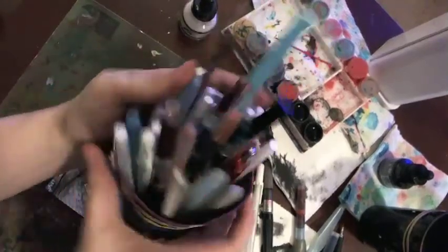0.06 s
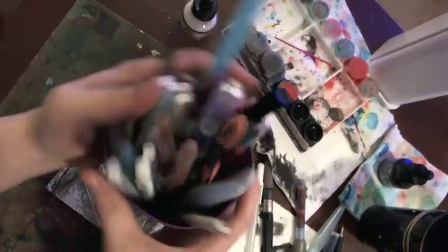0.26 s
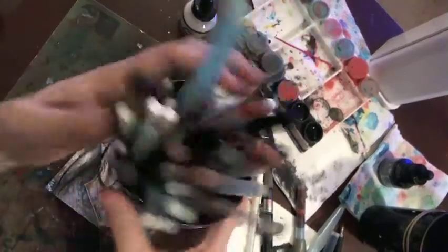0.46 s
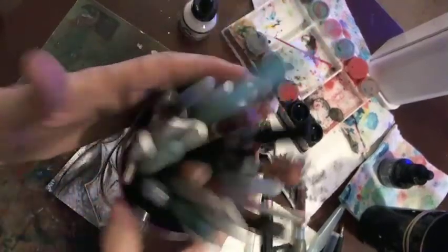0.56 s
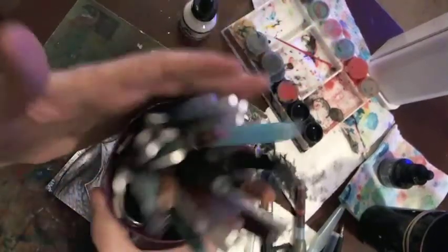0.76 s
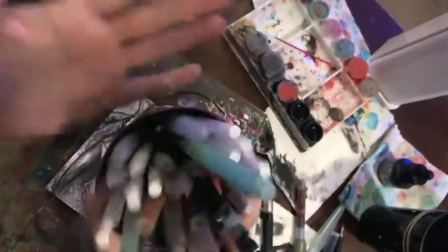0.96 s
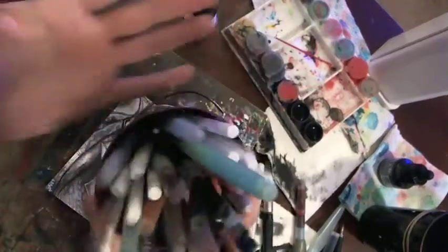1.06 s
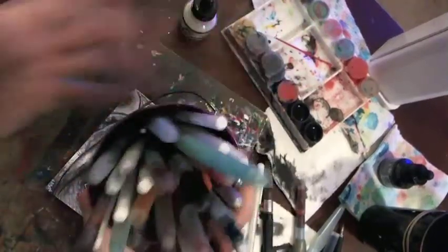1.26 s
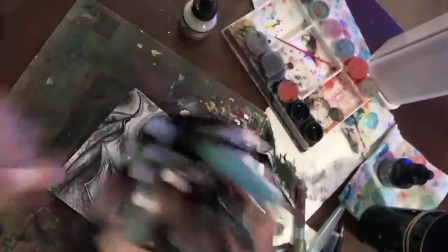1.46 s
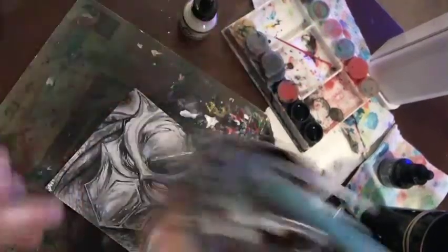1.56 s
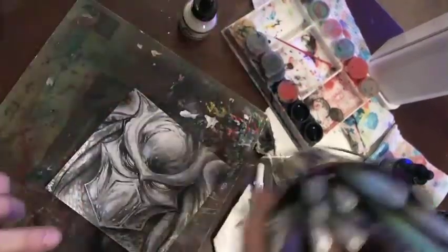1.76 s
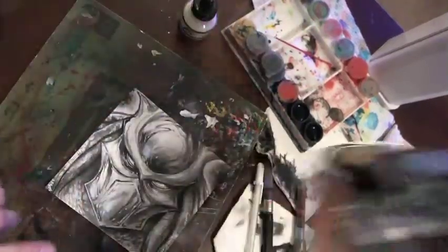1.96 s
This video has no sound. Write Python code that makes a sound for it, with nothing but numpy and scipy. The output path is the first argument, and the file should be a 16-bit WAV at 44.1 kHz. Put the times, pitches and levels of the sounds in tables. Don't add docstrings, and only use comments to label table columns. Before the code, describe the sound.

A cupful of pens and markers rattles brightly, pauses softly, then clatters again, close up

```python
import sys
import numpy as np
from scipy import signal
from scipy.fft import rfft, irfft
from scipy.io import wavfile

SR = 44100
rng = np.random.default_rng(int(sys.argv[2]) if len(sys.argv) > 2 else 0)


def generate_wav(signal):
    frames = np.transpose(np.atleast_2d(signal))
    scaled = np.clip(frames, -1, 1) * 32767
    pcm = np.round(scaled).astype(np.int16)
    wavfile.write(sys.argv[1], SR, pcm)


def natural_amplitude(level_db):
    exponent = np.asarray(level_db, float) / 20
    return 10 ** exponent


N = 88200

# [t/s, pen body peak level/dB, cup
# hollow re body level/dB, snap re body level/dB, ring of that pen f/Hz]
CLEAN_CLACKS = [(0.0388, -25.5, -27, -9.5, 2470), (0.1968, -16, -9.5, -15, 3000), (0.2083, -17, -5, 3, 5350),
                (0.2253, -0.5, -6.5, -8.5, 2497), (0.2411, -15.5, -3, -2.5, 1870),
                (0.2482, -4.5, -6, -10, 5300), (0.2493, -17.5, 6.5, 20, 5260), (0.329, -12, -6.5, 3.5, 3860),
                (0.3706, -13, -36, 18, 4600), (0.3731, -8.5, -2.5, 10, 4440),
                (0.4014, -17.5, -3, -5.5, 1890), (0.414, -4.5, -10, -15.5, 1920),
                (0.4348, -11.5, -14, -17, 2040), (0.4454, -14.5, -2.5, -5, 2580),
                (0.4817, -7, -15.5, -13, 1600), (0.5121, -20.5, -12.5, 11.5, 5470),
                (0.5211, -15, -10, 5.5, 5440), (0.5364, -18, -5, -13, 2460),
                (0.5932, -4.5, -16.5, -43.5, 1960), (0.6085, -8.5, -6.5, -3.5, 3820),
                (0.6139, -14.5, -3, 0, 2520), (0.6335, -13, -16, -6, 1890), (0.6474, -18, -16, -0.5, 2630),
                (0.849, -26, -40, -12, 2560), (0.8602, -24, -41.5, -5.5, 2280),
               (0.8945, -11, -15, -4.5, 2390), (0.9079, -11, -7.5, 2.5, 4780),
               (1.1806, -16, -8, -6.5, 2620), (1.255, -21.5, -49, -19, 2230),
               (1.3625, -39.5, 5.5, 11, 5240), (1.3935, -27, -27, -2, 2720),
               (1.412, -32, -20.5, -5.5, 2670), (1.4451, -35, -7.5, -1.5, 2630),
               (1.4507, -19.5, -23.5, -19, 1610), (1.4844, -19.5, -1, -4.5, 1710),
               (1.4935, -7.5, -12, -5, 2695), (1.5381, -8, -5.5, 5.5, 5350), (1.5478, -9, -2.5, 0.5, 2660),
               (1.6136, -23.5, -6.5, 5.5, 1660), (1.6357, -23.5, -17, 0, 2480), (1.659, -1.5, -10, 1, 2520),
               (1.6729, -18, -36.5, 0.5, 2780), (1.6801, -24.5, -9.5, 10.5, 8960),
               (1.6848, -25, -17.5, 12, 5270), (1.8493, -16.5, -14, -2, 1330),
               (1.8952, -19, -34, -4.5, 5110)]
# [t/s, pen body peak level/dB, cup hollow re body
# level/dB, snap re body level/dB, ring of that pen f/Hz]
GLANCING_CLACKS = [(0.0575, -26.5, -3, -16.5, 2460), (0.0754, -24, -2.5, -6, 2270),
                   (0.0901, -25.5, -5.5, -2, 5370), (0.1454, -36, 6, -5.5, 1590), (0.1854, -28, -9, 0.5, 5270),
                   (0.3844, -12.5, -6, 7.5, 5850), (0.4526, -11, -2, -0.5, 2800), (0.4942, -18, -8, -3, 2780),
                   (0.5544, -19.5, -5, -14.5, 1890), (0.57, -16.5, -2.5, -16.5, 1940),
                   (0.5856, -14, -32, -5, 1940), (0.6921, -16, -7, -4, 1626), (1.237, -34, -34, -21, 2550),
                   (1.2919, -39, -8, 3.5, 5900), (1.3523, -20, -13, -11, 2500), (1.4214, -35.5, -7, 0.5, 2750),
                   (1.4755, -9.5, -7, -19.5, 1560), (1.5213, -13, -1, -7, 2620),
                   (1.6191, -10, -6.5, -7.5, 1740), (1.8984, -32, -45.5, 16.5, 5420),
                   (0.818, -48, 8.5, -26.5, 2570),
    (1.147, -71.5, 39, -4.5, 1760),
    (1.2039, -30.5, -8, -16.5, 2580),
    (1.3094, -41, -15, -19, 2700),
    (1.3746, -31, -19, 3.5, 5320),
    (1.526, -18, -3, -3, 2683),
    (1.6264, -16.5, -1, -17, 2610),
]
# [t/s, pen body peak level/dB, cup hollow re body level/dB, snap
# re body level/dB, ring of that pen f/Hz]
MORE_CLEAN_CLACKS = [(.1895, -26.5, -4, -5, 2640), (.3145, -21, -8, -11, 1800), (.3775, -19.5, -19, 7.5, 8300),
                     (.3865, -20, -18.5, 5, 4380), (.394, -21, -12, 1.5, 6950), (.4245, -18.5, -17, -5.5, 2490),
                     (.4385, -9.5, -13.5, -8, 2100), (.4495, -10, -2, -1, 2480), (.454, -13.5, -9.5, 3, 5740),
                     (.4995, -17.5, -18.5, -9, 2700), (.5295, -21.5, -13, -5.5, 2600),
                     (.5525, -23, -10.5, -1, 4300), (.5585, -22, -10, -1.5, 4270), (.573, -18, -11, -7, 3020),
                     (.741, -49.5, 1, -17, 2480), (.946, -35, -21, -12, 2610), (1.105, -64, -21, 7, 5020),
                     (1.475, -30.5, -13, 0.5, 5250), (1.5, -23, -24, -1, 4500), (1.532, -17, -5, -4.5, 2050),
                     (1.6215, -13.5, -13, -1.5, 3600), (1.628, -19, -13, -9, 3540),
                     (1.711, -32, -17.5, 2.5, 2600), (1.737, -36.5, -20, 0, 2600), (1.812, -53, 8, -5, 2660),
                     (1.975, -54.5, -28.5, -1.5, 4240)]
# [t/s, level/dB, level/dB, level/dB, f/Hz]
PEN_SLIDES = [
    (.268, -24.5, -5.5, -5, 2600),
    (.925, -35, -10, -8.5, 2600),
    (1.192, -34.5, -6, -5.5, 2550),
    (1.243, -36.5, -22, -7.5, 2400),
    (1.265, -42, -6, -21, 2600),
    (1.302, -44, -2, -7, 2700),
    (1.366, -34.5, -15, -7, 2600),
    (1.4, -46, -10, -6, 2600),
    (1.862, -38, -12, -3.5, 2600),
    (1.91, -39.5, -29.5, 3.5, 5030),
]
# [t/s, peak level/dB, f/Hz]
BASE_KNOCKS = [
    (0.448, -41, 400),
    (.611, -31, 376),
    (1.478, -39, 420),
    (1.525, -35.5, 341.5),
    (1.549, -35, 326),
    (1.1465, -42.5, 800),
    (1.4783, -13.5, 1434),
]
# [t/s, level/dB]
SLIDING_LEVEL = [(0, -55), (0.052, -43.5), (0.146, -39.5), (0.177, -61), (0.201, -37), (0.449, -29),
                 (0.657, -34.5), (.75, -66), (0.879, -53), (0.928, -44), (0.999, -73.5), (1.16, -75.5),
                 (1.2, -84), (1.439, -58), (1.549, -41.5), (1.697, -35.5), (1.78, -67), (1.92, -65)]
# [f/Hz, level/dB, t60/s]
CUP_MODES = [(762.5, 11, 0.035), (687, 0, 0.016), (816, 0, 0.035), (521, -10, 0.028)]
BODY_MODES = [(1627, -19.5, 0.018), (1870, -7, 0.037), (2607, -6.5, 0.023), (2858, 7, 0.0029),
              (3640, -1, 0.012)]
SNAP_MODES = [(4384, 4, 0.013), (5260, 12.5, 0.01), (5850, 5.5, 0.0026), (7846, -8, 0.036),
              (9100, -22, 0.011)]
# [f/Hz, level/dB]
AIR_SPECTRUM = [(24, -23.5), (60, -8.5), (105, 7.5), (267, -0.5), (733, -14), (1920, -8.5), (3940, -34),
                (5260, -22.5), (10800, -35.5), (12500, -25.5), (16200, -60), (22000, -120)]
# [f/Hz, width f/Hz, level/dB]
PORT_RESONANCES = [(1174, 360, -11), (2580, 220, 6), (5270, 270, -4)]
# [f/Hz, left minus right level/dB]
CAPSULE_BALANCE = [(300, 1), (700, 2.5), (1800, 0.94), (3300, -3), (6400, 2), (9000, 2)]

LENGTH, LEAD = 4096, 400
MODE_SCATTER_DB, MODE_DETUNE = 3, 0.03
CRACK_DB, CRACK_T60_S = 11.5, 0.017
PAN_SCATTER_DB, SNAP_PAN_DB = -1.1, 1


def band(x, low_hz, high_hz):
    return signal.sosfilt(signal.butter(2, [low_hz, high_hz], "band", fs=SR, output="sos"), x)


def high_pass(x, hz, order=4):
    return signal.sosfilt(signal.butter(order, hz, "high", fs=SR, output="sos"), x)


def low_pass(x, hz, order):
    return signal.sosfilt(signal.butter(order, hz, fs=SR, output="sos"), x)


def rms_one(x):
    return x / np.sqrt(np.mean(x ** 2) + 1e-20)


def fade(t60_s):
    return natural_amplitude(-60 * np.arange(LENGTH) / SR / max(t60_s, 0.002))


def panned(x, pan_db):
    return x * natural_amplitude(np.array([[0.5], [-0.5]]) * pan_db)


def rings(modes, scatter=1):
    t = np.arange(LENGTH) / SR
    out = np.zeros(LENGTH)
    for hz, db, t60_s in modes:
        strength, detune = scatter * rng.standard_normal(2)
        tone = np.sin(2 * np.pi * hz * (1 + MODE_DETUNE * detune) * t)
        out += natural_amplitude(db + MODE_SCATTER_DB * strength) * fade(t60_s) * tone
    return out


def sliding_db():
    s, db = np.transpose(SLIDING_LEVEL)
    return np.interp(np.arange(N) / SR, s, db)


def air():
    hz, db = np.transpose(AIR_SPECTRUM)
    bins_hz = np.fft.rfftfreq(N, 1 / SR) + 1
    shape = natural_amplitude(np.interp(np.log(bins_hz), np.log(hz), db))
    shape = shape / (1 + (85 / bins_hz) ** 3)
    mid, side = rms_one(irfft(rfft(rng.standard_normal((2, N))) * shape, N))
    return natural_amplitude(-63.5) * (mid + natural_amplitude(-13) * side * np.array([[1], [-1]]))


def room(x):
    mid, side = rng.standard_normal((2, LENGTH)) * fade(0.1)
    width = 0.26
    tail = band(mid + width * side * np.array([[1], [-1]]), 120, 9200)
    tail = tail / np.sqrt(np.sum(tail ** 2) / 2)
    return natural_amplitude(-15) * signal.fftconvolve(x.mean(axis=0)[None], tail, axes=1)[:, :N]


def thud(hits):
    force = np.abs(band(hits, 500, 1000))
    return natural_amplitude(-33) * band(force, 45, 420)


def knocks():
    out = np.zeros(N + LENGTH)
    for s, db, hz in BASE_KNOCKS:
        i = int(s * SR)
        out[i:i + LENGTH] += natural_amplitude(db) * rings([(hz, 0, 16 / hz)], scatter=0)
    return band(out[:N], 200, 1900)


def scrape():
    low_hz, top_hz = 1500, 11800
    hiss = low_pass(band(rng.standard_normal(N), low_hz, top_hz + 4000), top_hz, 10)
    return rms_one(hiss) * natural_amplitude(-16 + sliding_db())


def chatter():
    contacts_per_s, size_spread_db, cup_db, snap_db = 5000, 2.3, -10.5, -6.5
    sizes = natural_amplitude(size_spread_db * np.minimum(rng.exponential(1, N), 5)) * rng.choice([-1, 1], N)
    taps = sizes * (rng.random(N) < contacts_per_s / SR)
    group = rng.integers(0, 6, N)
    out = np.zeros((2, N))
    for k in range(6):
        crack = natural_amplitude(CRACK_DB) * rng.standard_normal(LENGTH) * fade(CRACK_T60_S)
        body = rings(BODY_MODES) + band(crack, 650, 4000)
        snap = natural_amplitude(snap_db) * (rings(SNAP_MODES) + band(crack, 3800, 5700))
        cup = natural_amplitude(cup_db) * rings(CUP_MODES)
        sound = signal.fftconvolve(taps * (group == k), body + snap + cup)[:N]
        out += panned(sound, PAN_SCATTER_DB * rng.standard_normal())
    return rms_one(out) * natural_amplitude(sliding_db())


def contact_run(rise_s, run_s):
    t = (np.arange(LENGTH) - LEAD) / SR
    touching = rng.random(LENGTH) < 0.2
    run = rng.standard_normal(LENGTH) * touching * np.exp(np.minimum(t / rise_s, -t / run_s))
    run[LEAD] = 3.84 * 0.00092 / run_s
    return run


def thin(x):
    return high_pass(x, 1170)


def clack(rise_s, run_s, body_db, cup_db, snap_db, ring_hz):
    run = contact_run(rise_s, run_s)
    noise_fade = fade(CRACK_T60_S) + natural_amplitude(-22.5) * fade(0.072)
    crack = natural_amplitude(CRACK_DB) * rng.standard_normal(LENGTH) * noise_fade
    own = rings([(ring_hz, 8, 12 / ring_hz)], scatter=0)
    body = rings(BODY_MODES) + band(crack, 1300, 4000)
    snap = rings(SNAP_MODES) + band(crack, 4000, 11500)
    cup = rings(CUP_MODES, scatter=0.5) + natural_amplitude(7) * band(crack, 660, 860)
    if ring_hz < 4000:
        body = body + own
    else:
        snap = snap + own
    body_pan_db, snap_pan_db = np.array([PAN_SCATTER_DB, SNAP_PAN_DB]) * rng.standard_normal(2)
    layers = [(thin(body), -0.5, body_pan_db),
              (thin(snap), snap_db + 5.5, snap_pan_db),
              (cup, cup_db + 5.5, 0)]
    out = np.zeros((2, LENGTH))
    for response, db, pan_db in layers:
        x = signal.fftconvolve(run, response)[:LENGTH]
        out += panned(natural_amplitude(body_db + db) * x / np.abs(x).max(), pan_db)
    return out


def clacks():
    # events, rise/s, run/s, delay to the firm contact/s
    kinds = [(CLEAN_CLACKS, 0.0009, 0.00092, 0.001),
             (GLANCING_CLACKS, 0.0026, 0.004, 0.0023),
             (MORE_CLEAN_CLACKS, 0.0009, 0.00092, 0.001),
             (PEN_SLIDES, 0.009, 0.0097, 0.003)]
    out = np.zeros((2, N + LENGTH))
    for events, rise_s, run_s, delay_s in kinds:
        for s, *levels_and_ring in events:
            i = int((s + delay_s) * SR) - LEAD
            out[:, i:i + LENGTH] += clack(rise_s, run_s, *levels_and_ring)
    return out[:, :N]


def scene():
    hits = clacks()
    pens = high_pass(chatter() + hits, 676)
    return air() + room(pens) + thud(hits) + knocks() + scrape() + pens


def roll_off(x):
    return signal.sosfilt(signal.butter(12, 13650, fs=SR, output="sos"), x)


def record(dry):
    hz = np.fft.rfftfreq(N, 1 / SR) + 1
    colour_db = sum(db / (1 + ((hz - centre) / width * 2) ** 2) for centre, width, db in PORT_RESONANCES)
    at_hz, lean_db = np.transpose(CAPSULE_BALANCE)
    balance_db = np.interp(np.log(hz), np.log(at_hz), lean_db)
    x = irfft(rfft(dry) * panned(natural_amplitude(colour_db), balance_db), N)
    x = low_pass(x, 9600, 6)
    ceiling = 1.4
    squashed = np.clip(ceiling * np.tanh(x / ceiling), -1, 1)
    x = x + high_pass(squashed - x, 700, 2)
    x = x + high_pass(np.clip(x, -0.95, 0.95) - x, 700, 2)
    return roll_off(np.clip(x, -1, 1))


dry = scene()
out = record(dry)
generate_wav(out)
```